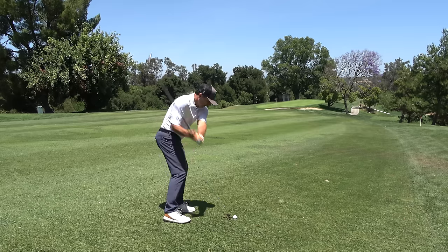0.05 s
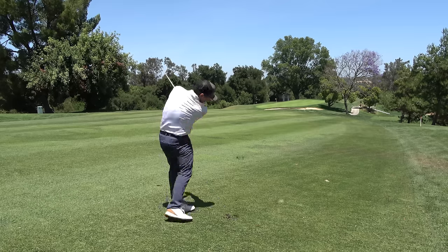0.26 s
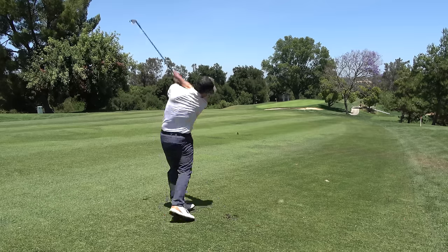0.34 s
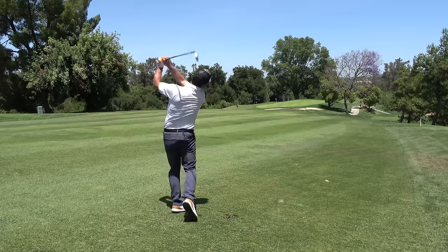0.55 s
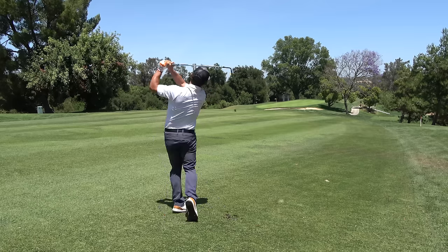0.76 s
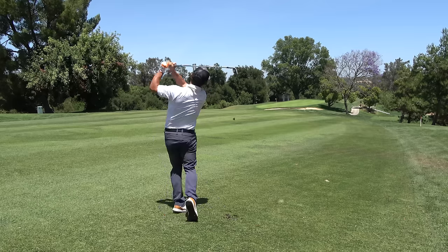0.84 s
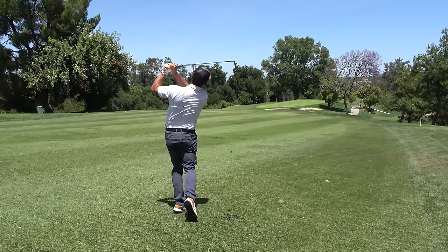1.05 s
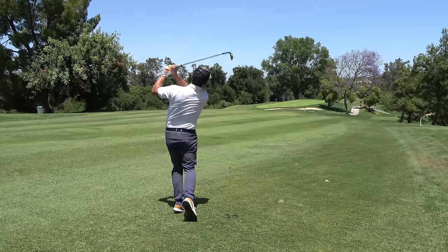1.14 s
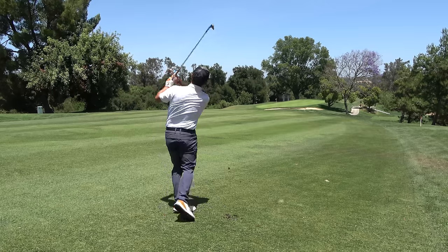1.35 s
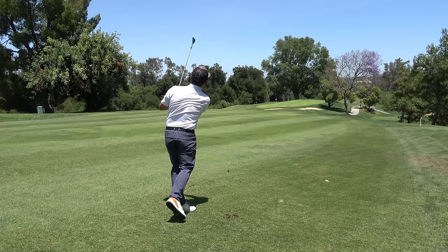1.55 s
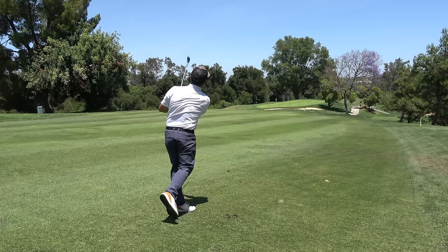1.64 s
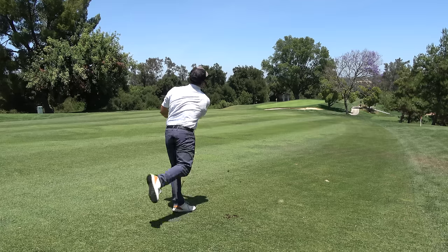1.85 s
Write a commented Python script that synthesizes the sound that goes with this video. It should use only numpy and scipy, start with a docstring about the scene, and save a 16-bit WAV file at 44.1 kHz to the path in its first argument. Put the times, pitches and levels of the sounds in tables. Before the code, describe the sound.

One hard, dry golf shot click off grass, then torn turf, cloth rustle and faint birdsong

```python
"""On fairway turf an iron strikes a golf ball, heard by a microphone that moving air and cloth disturb.
The shaft swooshes as a noisy band of gliding pitch; ball and head ring as decaying modes, with a bright
crack, ground thud, and turf tearing and spraying as shaped noise. Cloth rustles as grainy noise and ticks
as damped snaps. Lumpy low noise buffets the microphone, and a far bird trills over faint hiss."""
import sys
import numpy as np
from scipy import signal
from scipy.fft import rfft, irfft, next_fast_len
from scipy.io import wavfile
from scipy.ndimage import uniform_filter1d, map_coordinates

SR = 44100
rng = np.random.default_rng(int(sys.argv[2]) if len(sys.argv) > 2 else 0)


def invert_db(x):
    """Field ratio 10**(x/20) for x, a level in decibels (scalar or array-like)."""
    u = np.asarray(x, float) / 20
    return 10 ** u


def pcm_store(signal):
    """Save signal as 16-bit PCM."""
    levels = np.round(np.clip(np.atleast_2d(signal), -1, 1) * 32767)
    wavfile.write(sys.argv[1], SR, levels.astype(np.int16).T)


N = 83790
T = np.arange(N) / SR  # seconds

# Mode of the squeezed ball. The row: frequency in Hz, level in dB before swell and decay, T60 in seconds.
BALL_MODE = (1220, 10.5, .0068)
# Modes of the freed club head. Each row: frequency in Hz, level in dB before swell and decay, T60 in seconds.
HEAD_MODES = [(1760, 9.5, .0055), (2590, 4.2, .0068), (3075, -17, .017), (3492, -14, .02), (3900, -22, .02),
              (4598, -23, .014), (5505, -26, .016), (7900, -32, .01), (9480, -30, .012), (10450, -32, .009)]
# Modes of the ground under the sole. Each row: frequency in Hz, level in dB before swell and decay,
# T60 in seconds.
GROUND_MODES = [(300, -30, .025), (395, -25, .03), (535, -18, .035), (665, -22, .025), (830, -26, .015)]
# Spectrum of the crack as the ball leaves. Each row: frequency in Hz, relative density in dB per Hz.
CRACK_SPECTRUM = [(4000, -40), (7000, -5), (10000, 0), (13000, -2), (15000, -5), (15800, -14)]
# Spectrum of the sole tearing through turf. Each row: frequency in Hz, relative density in dB per Hz.
TURF_SPECTRUM = [(120, -20), (300, -9), (550, -3), (800, -9), (1200, -11), (2200, -8), (3400, -2),
                 (5000, -15), (6300, -30), (9000, -31), (15800, -42)]
# Swoosh of the shaft. Each row: time in seconds, level in dB, vortex pitch in Hz.
SHAFT_SWOOSH = [(.19, -74, 300), (.22, -47.5, 440), (.24, -41.5, 520), (.256, -37, 560), (.272, -39.5, 389),
                (.29, -58.5, 336), (.34, -68.5, 302)]
# Airy swish early in the downswing. Each row: time in seconds, level in dB, pitch in Hz.
EARLY_SWISH = [(.09, -85, 7000), (.11, -72, 7080), (.122, -66, 6480), (.137, -72, 4500), (.15, -70, 3860),
               (.17, -90, 3500)]
# Torn grass and soil spraying. Each row: centre in seconds, level in dB, half width (to 1/e) in seconds.
SPRAY_BURSTS = [(.298, -63.5, 0.0031), (0.32, -52, 0.0066), (0.351, -55, .01), (.378, -62.5, .014),
                (.426, -65, 0.0037), (.46, -64, 0.023), (.52, -72, .03)]
# Spectrum of grit and crackle. Each row: frequency in Hz, relative density in dB per Hz.
GRIT_SPECTRUM = [(800, -19), (2000, -4), (4000, 0.5), (8000, -7.5), (12000, -22.5), (15800, -22.5)]
# Cloth rubbing, in two groups. Each row: time in seconds, level in dB before the gain in cloth().
CLOTH_RUSTLE = [
    [(0.0, -81), (0.076, -66), (0.086, -68.5), (0.12, -56), (0.148, -57.5), (0.158, -62), (0.168, -66),
     (0.192, -65), (0.202, -62), (0.214, -59.5), (0.25, -52), (0.252, -60)],
    [(0.274, -48), (0.276, -50.5), (0.306, -60.5), (0.32, -48.5), (0.332, -61.5), (0.346, -50.5),
     (0.408, -65), (0.426, -59), (0.434, -65.5), (0.458, -60), (0.492, -66.5), (0.52, -66), (0.578, -73.5),
     (0.62, -69.5)],
]
# Cloth settling after the finish. Each row: time in seconds, level in dB before the gain in cloth().
CLOTH_SETTLING = [(.8, -74), (1.1, -78), (1.19, -71.5), (1.3, -74), (1.45, -69.5), (1.56, -73), (1.64, -73),
                  (1.78, -71), (1.83, -79.5), (1.9, -71.5)]
# Spectrum of rubbing cloth. Each row: frequency in Hz, relative density in dB per Hz.
CLOTH_SPECTRUM = [(180, -31), (300, 2.5), (477, -11), (1010, -0.5), (1130, -6.5), (1290, -5.5), (3980, -14),
                  (7730, -28.5), (15800, -43.5)]
# Ticks of cloth or spikes. Each row: time in seconds before a short delay, level in dB before filter and
# doubling, pitch in Hz.
CLOTH_TICKS = [(0.1571, -32, 1440), (0.2022, -40, 3420), (0.207, -57, 3000), (1.028, -58, 2500),
               (0.4262, -55, 4000), (.448, -53, 1500), (1.346, -54, 4950), (1.467, -54, 6600),
               (1.703, -60, 3000), (1.729, -53, 6000), (1.3931, -48, 4100), (1.454, -50, 3800),
               (1.478, -47, 4240), (1.5153, -52, 3750), (1.5262, -49, 4930), (1.5575, -51, 3800),
               (1.5767, -46.5, 4510), (1.5952, -54, 6030), (1.6356, -51, 4500), (1.6628, -52, 4000),
               (1.569, -56, 2800), (1.678, -58, 3500), (1.756, -61, 2500), (1.6924, -49.5, 3950),
               (1.7475, -54, 4540), (1.7686, -50, 5000), (1.7757, -43, 228), (1.7764, -46.5, 810),
               (1.7786, -48, 2470), (1.7892, -50.5, 3500), (1.8075, -53, 5030), (1.8565, -57, 3860)]
# Air on the microphone. Each row: time in seconds, level in dB.
BUFFET_LEVEL = [(0.0, -74), (0.026, -42), (0.184, -35), (0.222, -35.5), (0.248, -31), (0.348, -30.5),
                (0.39, -33), (0.418, -27.5), (0.444, -35), (0.46, -31.5), (0.518, -37.5), (0.544, -40.5),
                (0.856, -57), (1.222, -51.5), (1.274, -40.5), (1.316, -44), (1.41, -46), (1.476, -51),
                (1.63, -52.5), (1.704, -48.5), (1.772, -52.5), (1.82, -53), (1.846, -61), (1.9, -57)]
# Spectrum of the buffeting. Each row: frequency in Hz, relative density in dB per Hz.
RUMBLE_SPECTRUM = [(8.8, -39.5), (15, -5.5), (27, -0.5), (45, -5.5), (92, -14), (183, -20.5), (262, -29.5),
                   (503, -34.5), (900, -48), (1170, -68.5), (1980, -120)]
# Single strong puffs. Each row: centre in seconds, level in dB before the last column, frequency in Hz,
# half width (to 1/e) in seconds, signed factor for push or pull.
AIR_PUFFS = [(.345, -14, 35.6, 0.017, -0.87), (0.289, -20, 51.6, 0.0067, -0.97),
             (0.414, -12, 44.2, 0.012, 0.2), (0.441, -23, 71, 0.0027, 0.97), (0.493, -25, 57, 0.011, 0.79),
             (.516, -24, 45.24, 0.01, 0.97), (1.273, -39, 44, 0.0052, 1),
             (1.702, -40.5, 32.6, 0.023, -1.07), (1.816, -41, 30.97, 0.0067, 0.61)]
# Notes of the far bird. Each row: start in seconds, level in dB before dip and pulsing.
BIRD_NOTES = [(0.613, -65.5), (0.647, -62), (0.694, -64), (0.744, -66), (.790, -66), (.843, -68),
              (.888, -69), (.943, -69), (0.989, -71.5)]
# Distant murmur of the course and microphone hiss. Each row: frequency in Hz, relative density in dB per Hz.
AIR_SPECTRUM = [(40, -31.5), (70, 2), (150, -5), (300, -12.5), (600, -18), (1200, -29), (3000, -32),
                (6000, -36), (15800, -43.5)]


def unit(x):
    """Normalization: x at rms 1."""
    return x / np.sqrt(np.mean(x ** 2) + 1e-20)


def noise():
    """White noise: equal mean power at every frequency."""
    return rng.standard_normal(N)


def wobble(rate):
    """Interpolated random process: a smooth curve with rate knots a second."""
    return map_coordinates(rng.standard_normal(10000), [T * np.clip(rate, .1, 5000)])


def coloured(x, spectrum):
    """Linear filtering: x weighted by a spectrum on a log frequency axis, at rms 1."""
    size = next_fast_len(N + 8192)
    hz, db = np.transpose(spectrum)
    log_hz = np.log(np.fft.rfftfreq(size, 1 / SR) + 1)
    gain = invert_db(np.interp(log_hz, np.log(hz + 1), db))
    return unit(irfft(rfft(x, size) * gain, size)[:N])


def curve(rows, column=1):
    """Linear interpolation: one table value per sample."""
    points = np.array(rows)
    return np.interp(T, points[:, 0], points[:, column])


def ring(modes, start):
    """Modal superposition: damped modes swell and die from start, neighbours in opposite phase."""
    swell_s = .0014
    t = np.maximum(T - start, 0)
    total = np.zeros(N)
    for k, (hz, db, t60) in enumerate(modes):
        sign = (-1) ** (k + 1)
        total += sign * invert_db(db - 60 * t / t60) * np.sin(2 * np.pi * hz * t)
    return (1 - np.exp(-t / swell_s)) * total


def vortices(rows, width_hz):
    """Random modulation of two carriers in quadrature: a broad noisy band on a gliding pitch."""
    phase = 2 * np.pi * np.cumsum(curve(rows, column=2)) / SR
    band = wobble(width_hz) * np.sin(phase) + wobble(width_hz) * np.cos(phase)
    sounding = (T > rows[0][0]) * (T < rows[-1][0])
    return invert_db(curve(rows)) * unit(band) * sounding


def grains(per_s):
    """Random impulses: sparse grains of uneven strength, at rms 1."""
    spread_db, biggest = 3.2, 2.5  # the biggest is counted in spreads
    struck = rng.random(N) < per_s / SR
    strength = invert_db(spread_db * np.minimum(rng.exponential(size=N), biggest))
    return unit(struck * strength * noise())


def turf_tear(blow_s, late_s):
    """Friction noise: the sole tears the turf, fading slowly at first and then fast."""
    level_db, fade_db, long_s, t60_s = -26.5, 5, .0085, .004
    t = np.maximum(T - blow_s, 0)
    u = t - late_s
    slow_db = fade_db * np.clip(u / long_s, 0, 1)
    fast_db = 60 * np.maximum(u - long_s, 0) / t60_s
    onset = np.clip(t / late_s, 0, 1) ** 2
    return invert_db(level_db - slow_db - fast_db) * onset * coloured(noise(), TURF_SPECTRUM)


def blow():
    """Impact excitation: the ball rings, then the freed head rings and a crack sounds; ground and turf follow."""
    blow_s, contact_s, turf_late_s = .25886, .00043, .002
    crack_db, crack_long_s = -38, .0029
    free_s = blow_s + contact_s
    crack_shape = np.exp(-(2 * (T - free_s) / crack_long_s - 1) ** 4)
    crack = invert_db(crack_db) * crack_shape * coloured(noise(), CRACK_SPECTRUM)
    club_and_ball = ring([BALL_MODE], blow_s) + ring(HEAD_MODES, free_s) + crack
    thud = ring(GROUND_MODES, blow_s + turf_late_s)
    return club_and_ball + thud + turf_tear(blow_s, turf_late_s)


def swoosh():
    """Vortex shedding: pitch and level rise as the shaft speeds up, then fall; an airy swish leads."""
    return vortices(SHAFT_SWOOSH, width_hz=450) + vortices(EARLY_SWISH, width_hz=5000)


def spray():
    """Granular impacts: grit from the divot sounds in grainy noise bursts."""
    bursts = sum(invert_db(db) * np.exp(-((T - s) / width) ** 2) for s, db, width in SPRAY_BURSTS)
    return bursts * coloured(1.2 * grains(per_s=2500) + noise(), GRIT_SPECTRUM)


def cloth():
    """Dry friction: rubbing fibres give noise mixed with uneven grains."""
    gain_db = 3
    rub = coloured(.7 * grains(per_s=1500) + noise(), CLOTH_SPECTRUM)
    level_db = curve(np.vstack(CLOTH_RUSTLE + [CLOTH_SETTLING]))
    return invert_db(gain_db + level_db) * rub


def ticks():
    """Damped oscillation: short, dull snaps, with noisy fizz on those pitched above 1000 Hz."""
    cycles, fizz_share, top_hz, delay_s = 1.4, .3, 8500, .0008  # each snap falls 20 dB in these cycles
    out, t = np.zeros(N + SR), np.arange(SR // 50) / SR
    for s, db, hz in CLOTH_TICKS:
        decay = invert_db(db - 20 * t * hz / cycles)
        fizz = fizz_share * rng.standard_normal(len(t)) * (hz > 1000)
        snap = decay * (fizz - np.sin(2 * np.pi * hz * t))
        lowpass = signal.butter(3, min(top_hz, 3.0 * hz), fs=SR)
        start = round((s + delay_s) * SR)
        out[start:][:len(t)] += 2 * signal.lfilter(*lowpass, snap)
    return out[:N]


def crackle():
    """Random impulses: tiny bright snaps fall between the late ticks."""
    from_s, to_s, per_s, level_db = 1.38, 1.86, 110, -57
    snaps = (rng.random(N) < per_s / SR) * noise() * (T > from_s) * (T < to_s)
    snaps_rms = np.sqrt(np.mean(snaps ** 2))
    return invert_db(level_db) * coloured(snaps, GRIT_SPECTRUM) * snaps_rms


def buffet():
    """Turbulent pressure: a lumpy low rumble held to its strength, and single strong puffs."""
    lumpy_db, lumps_per_s, even_s = 4.5, 18, .05
    rumble = invert_db(lumpy_db * wobble(lumps_per_s)) * coloured(noise(), RUMBLE_SPECTRUM)
    power = rumble ** 2
    for _ in range(2):
        power = uniform_filter1d(power, int(even_s * SR))
    rumble = rumble / np.sqrt(np.abs(power) + .02)
    puffs = np.zeros(N)
    for s, db, hz, width, way in AIR_PUFFS:
        swell = np.exp(-((T - s) / width) ** 2)
        puffs += way * invert_db(db) * swell * np.cos(2 * np.pi * hz * (T - s))
    return invert_db(curve(BUFFET_LEVEL)) * rumble + puffs


def bird():
    """Frequency and amplitude modulation: pulsed notes dip in pitch and return, blurred by the trees."""
    note_s, high_hz, flick_hz, dip_hz, dip_db = .034, 3690, 280, 420, 5
    pulse_hz, waver_hz, wet_db, trees_t60_s = 80, 50, -4, .12
    song, waver = np.zeros(N), waver_hz * wobble(waver_hz * 2)
    for s, db in BIRD_NOTES:
        u = np.clip((T - s) / note_s, 0, 1)  # progress through the note
        dip = np.sin(np.pi * u) ** 4
        hz = high_hz + flick_hz * np.exp(-u / .1) - dip_hz * dip + waver
        pulses = .3 + np.abs(np.sin(np.pi * pulse_hz * (T - s)))
        envelope = np.sin(np.pi * u ** .5) ** .5
        song += invert_db(db - dip_db * dip) * envelope * pulses * np.sin(2 * np.pi * np.cumsum(hz) / SR)
    t = np.arange(SR // 4) / SR
    tail = rng.standard_normal(len(t)) * invert_db(-60 * t / trees_t60_s)
    echo = signal.fftconvolve(song, tail / np.linalg.norm(tail))[:N]
    return song + invert_db(wet_db) * echo


def air():
    """Stationary noise: a steady murmur and hiss, its level swaying a little."""
    level_db, sway_db, sways_per_s = -59, 1, 1.7
    return invert_db(level_db + sway_db * wobble(sways_per_s)) * coloured(noise(), AIR_SPECTRUM)


def scene():
    """Superposition: the pressures of all sources add at one microphone."""
    mix = buffet() + air() + cloth() + ticks() + swoosh() + blow() + bird() + spray() + crackle()
    return mix[None]  # one channel


def roll_off(x):
    """The treble ends steeply here."""
    return signal.sosfilt(signal.butter(12, 15920, fs=SR, output="sos"), x)


def record(dry):
    """Saturation and band limiting: the input rounds off the highest peaks and cuts the top treble."""
    ceiling, top_hz = .72, 15900  # ceiling as a share of full scale
    rounded = dry / (1 + np.abs(dry / ceiling) ** 6) ** (1 / 6)
    passed = np.fft.rfftfreq(N, 1 / SR) < top_hz
    mix = irfft(rfft(rounded) * passed, N)
    return roll_off(mix)


dry = scene()
out = record(dry)
pcm_store(out)
```